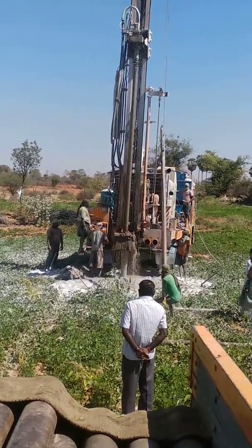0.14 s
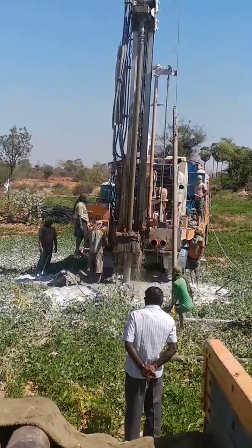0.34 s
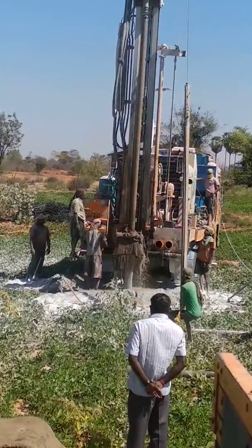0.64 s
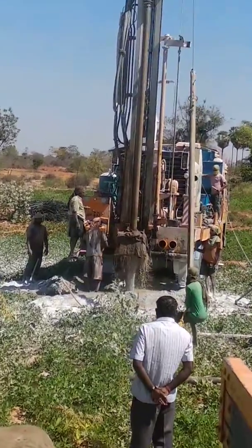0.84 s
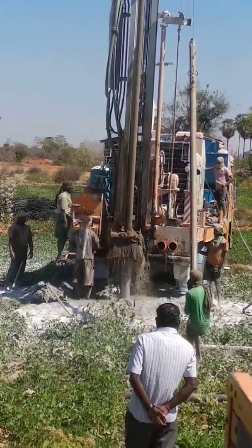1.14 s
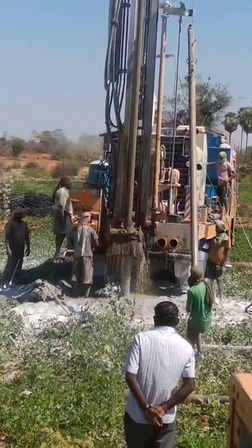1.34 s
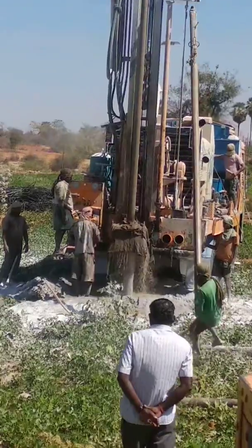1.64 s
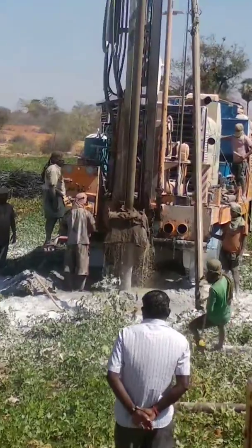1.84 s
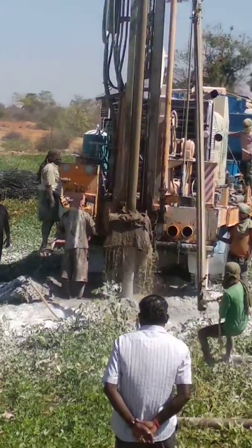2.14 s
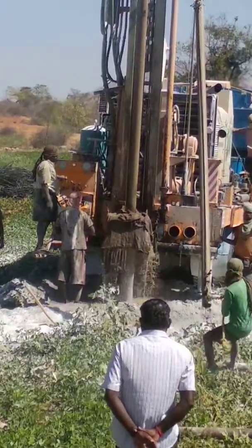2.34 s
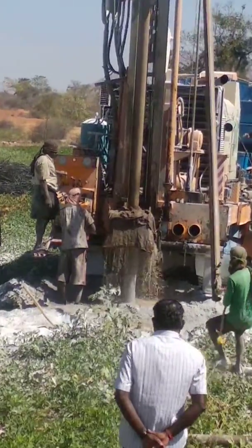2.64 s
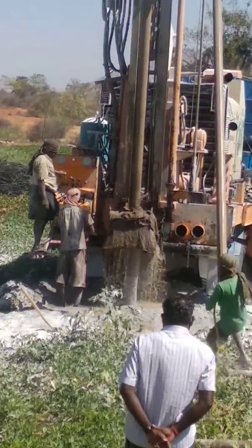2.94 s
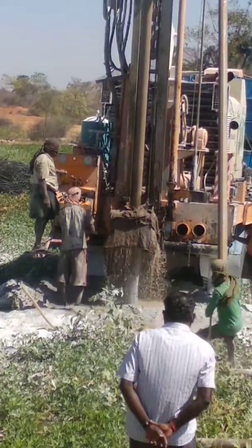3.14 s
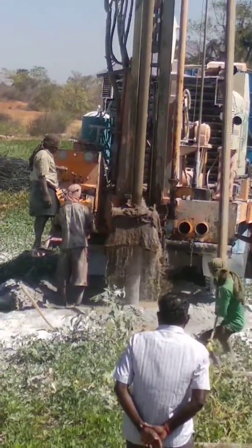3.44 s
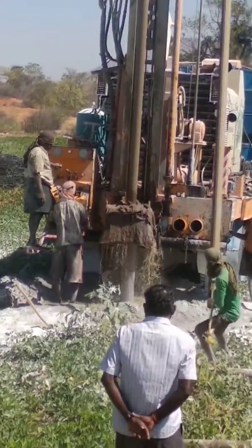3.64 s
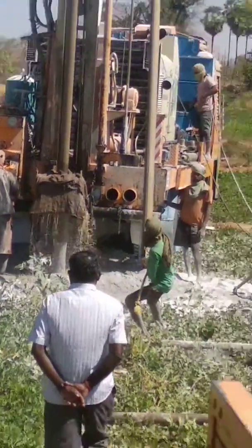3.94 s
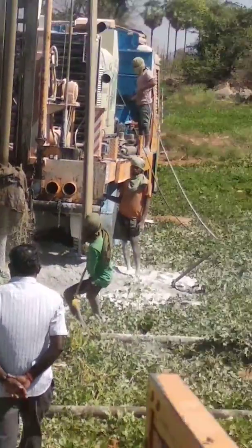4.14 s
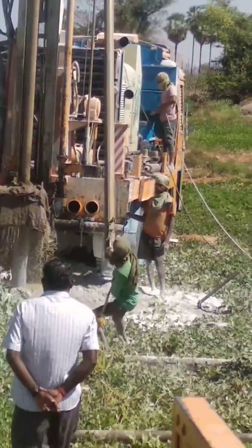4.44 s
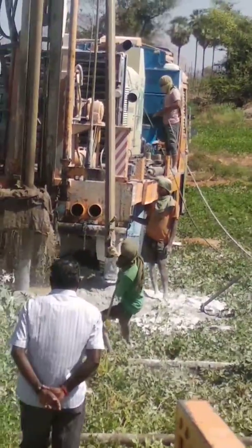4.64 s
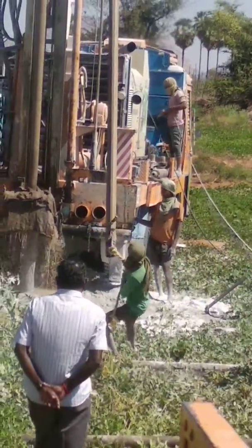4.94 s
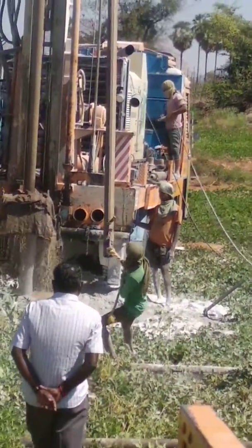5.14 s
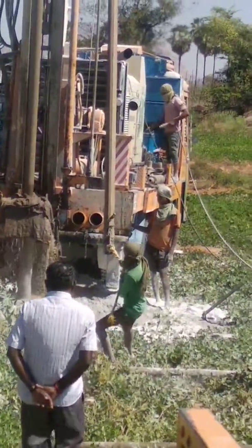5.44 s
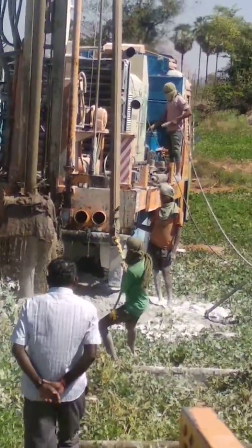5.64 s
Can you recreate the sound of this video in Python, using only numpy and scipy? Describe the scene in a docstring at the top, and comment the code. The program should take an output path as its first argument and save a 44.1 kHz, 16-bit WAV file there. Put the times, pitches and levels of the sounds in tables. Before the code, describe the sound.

Compressed air blasts from a drill pipe with a thin whistle, then hisses and spurts over a steady, clattering diesel engine.

```python
"""Compressed air blasts from a borewell rig's drill pipe for two seconds, ringing the pipe, with a thin
whistle gliding on top. Air and rock dust keep hissing from the bore afterwards, with a few short spurts.
Underneath, the compressor's six-cylinder diesel holds a steady bed of firing tone, roar and clatter,
while the frame knocks, steel squeals and the drill scrapes on grit.
Mast, truck and ground scatter the air and the rubbing steel in the open field."""
import sys
import numpy as np
from scipy import signal
from scipy.fft import rfft, irfft
from scipy.io import wavfile
from scipy.ndimage import uniform_filter1d

SR = 44100
rng = np.random.default_rng(int(sys.argv[2]) if len(sys.argv) > 2 else 0)


def bounce(signal):
    """Save signal as a 16-bit WAV file at the path given by the first command-line argument."""
    frames = np.transpose(np.atleast_2d(signal))
    limited = np.clip(frames, -1, 1)
    pcm = np.round(limited * 32767).astype(np.int16)
    wavfile.write(sys.argv[1], SR, pcm)


N = 255266
T = np.arange(N) / SR
FREQ = np.maximum(np.arange(N // 2 + 1) * SR / N, 1)

# stereo image of the noise: f/Hz, left-right correlation
STEREO_LIKENESS = [(130, 0.85), (290, 1), (640, 0.56), (1410, 0.098), (2400, 0.46), (6800, 0.56),
                   (15000, 0.8)]
# tonal tilt between the microphone ports: f/Hz, left minus right/dB
PORT_BALANCE = [(100, 0.8), (400, 1), (700, 0.5), (4400, 0), (5900, 1.5), (6700, -1), (8500, -4.5),
                (10000, -1), (11200, -3.5), (12500, 4), (15000, 2.5)]

# exhaust partials: multiple of the two-turn engine cycle, relative level/dB
EXHAUST_PARTIALS = [(4, -24), (5, -27), (9, -21.5), (10, -19.5), (11, -16.5), (12, -15), (15, -22),
                    (16, -20.5), (18, -20.5), (22, -16.5), (23, -33), (24, -22.5), (28, -19.5), (35, -22),
                    (37, -21), (46, -22), (72, -23)]
# body of the exhaust roar: f/Hz, relative level/dB
ROAR_EQ = [(20, -27), (35, -22), (55, -0.5), (90, 4.5), (120, -3), (165, 0.5), (290, -1), (350, 5.5),
           (410, -2), (455, -6), (490, -3), (600, -13), (900, -10), (2000, -66)]
# colour of the engine clatter: f/Hz, relative level/dB
CLATTER_EQ = [(300, -2.5), (600, 2), (710, 5.5), (900, -3), (1050, 2), (1200, 5.5), (1400, -2), (1650, -1),
              (1880, 4), (2080, -2), (2500, -9), (3200, -9), (6000, -8), (14000, -31)]
# ringing engine panels: f/Hz, width/Hz, boost/dB
PANEL_MODES = [(1030, 32, 4.5), (1525, 9.4, 14.5), (2225, 37, 13.5), (2672, 65, 17), (2865, 28, 11.5)]
# moments of harder rattling: t/s, half length/s, boost/dB
RATTLE_CUES = [(0.246, 0.46, 3), (1.012, 0.16, 1.5), (1.296, 0.16, 4.5), (1.527, 0.068, 5),
               (2.284, 0.048, 4.5), (3.658, 0.048, 5.5), (4.667, 0.25, 4), (5.635, 0.084, 2.5)]
# dull bumps of the machinery: t/s, level/dB
KNOCK_CUES = [(.44, -37), (3.14, -36), (4.66, -44), (5.527, -33)]
# drill steel on grit: t/s, half length/s, level/dB, f/Hz
SCRAPE_CUES = [(0.145, 0.021, -51, 1960), (.92, 0.18, -44, 2080), (2.892, 0.039, -40, 2300),
               (2.99, .014, -44, 1980), (3.178, 0.05, -43.5, 2750), (3.22, 0.06, -45, 1960),
               (3.665, 0.022, -43, 1900), (4.715, 0.031, -43, 1250), (5.155, 0.035, -41, 1920),
               (5.635, 0.04, -37.5, 2340), (5.69, 0.067, -37, 3450), (5.785, 0.03, -35, 3720)]
# steel rubbing on steel: t/s, half length/s, level/dB, f/Hz
SQUEAL_CUES = [(0.066, 0.015, -38, 2660), (0.167, 0.036, -41, 2750), (0.27, 0.041, -45, 2220),
               (0.74, 0.031, -31.5, 2680), (.86, 0.11, -45, 2690), (1.554, 0.024, -41, 2670),
               (3.144, 0.1, -43, 2710), (3.374, 0.079, -49, 2200), (4.754, .025, -46, 2730),
               (4.89, 0.031, -44, 2720), (5.02, 0.039, -43, 2800), (5.294, 0.031, -43, 2680),
               (5.455, 0.031, -38, 2740)]

# resonances of a leaking joint: f/Hz, width/Hz, relative level/dB
LEAK_MODES = [(5570, 170, -14), (6800, 590, -0.5), (7400, 300, -17), (8750, 230, -7.5), (10900, 600, -15),
              (12240, 100, -10)]
# faint hisses ahead of the blast: t/s, level/dB, decay/s
LEAK_CUES = [(0, -41, 0.06), (.16, -38, 0.15)]
# dust hiss building behind the blast: t/s, level/dB
DUST_FADER = [(0, -57), (.4, -46), (2.45, -33.5), (2.7, -37.5), (3.05, -34), (3.6, -34.5), (3.75, -38),
              (3.9, -36), (4.5, -37), (5.1, -34.5)]
# colour of the dust hiss: f/Hz, relative level/dB
DUST_EQ = [(1500, -40), (2400, 0), (3100, -4), (3500, 4.5), (4600, 2.5), (5400, 6), (6050, 3), (6400, -1),
           (6900, 7), (8500, 3.5), (10500, 4.5), (11500, -3.5), (13700, -5.5), (15500, -11)]
# gusts of grit from the bore: t/s, decay/s, level/dB, low edge/Hz, high edge/Hz
GUST_CUES = [(0, 0.045, -33, 7740, 11600), (2.87, 0.058, -36.5, 6340, 13000), (3.058, .1, -40, 6300, 11000),
             (4.016, 0.15, -39.5, 8000, 13000), (4.298, 0.054, -37.5, 4900, 13000),
             (5.165, 0.13, -39, 9000, 10900), (5.677, 0.51, -37, 1660, 5000)]
# resonances of the air outlet: f/Hz, width/Hz, gain/dB
OUTLET_MODES = [(3900, 90, -4), (4200, 120, 2), (4580, 400, -2), (5042, 60, 6), (5141, 50, 4),
                (5314, 80, 7), (5573, 70, 4), (6450, 200, -3), (7093, 60, 4)]
# late spurts from the pipe: t/s, decay/s, level/dB, high edge/Hz, rush re spurt/dB
SPURT_CUES = [(3.397, 0.09, -28.5, 6050, -8.5), (3.818, 0.037, -36, 6070, -7),
              (5.2, 0.12, -23.5, 7480, -12), (5.416, 0.075, -15, 7440, -7)]
# low rush under a spurt: f/Hz, relative level/dB
SPURT_RUSH_EQ = [(1300, -46), (1900, -3.5), (3100, -2.5), (3600, 6.5), (4700, 12), (5600, -43), (6500, -42)]

# glide of the whistle at the air valve: t/s, f/Hz
WHISTLE_GLIDE = [(.56, 16400), (.64, 13900), (.73, 12350), (.88, 11900), (1.02, 13180), (1.15, 14880),
                 (1.3, 14200), (1.6, 13780), (1.82, 13980), (2.04, 16000)]
# three bands of rough rasp in the surge: f/Hz, nominal width/Hz, relative level/dB
RASP_BANDS = [(3610, 400, -4), (4060, 240, -3), (4450, 420, 0)]
# bright accents on the jet: t/s, half length/s, level/dB, f/Hz, left minus right/dB
FLARE_CUES = [(0.62, 0.028, -19.5, 6700, 0), (0.81, 0.064, -16.5, 10600, -6),
              (1.387, 0.034, -17.5, 10800, -4), (2.117, 0.056, -26.5, 10200, -13)]
# rush of air below the pipe's cut-on: f/Hz, relative level/dB
RUSH_EQ = [(1000, -55), (1800, 2), (2400, -1), (2720, 5.5), (3050, -27), (3700, -13), (4200, -25),
           (4500, 16), (4800, 3), (5500, -41)]
# mild peaks and dips that give the rush a hollow colour: f/Hz, width/Hz, gain/dB
HOLLOW_EQ = [(2715, 70, 2), (3100, 120, -2), (3480, 130, 1), (3720, 70, 2), (4000, 110, 2), (4340, 90, 2),
             (4790, 100, -4)]
# level ride of the rush and the pipe wall: t/s, gain/dB
RUSH_FADER = [(.42, -23), (.52, -3), (.62, -7), (.72, -0.5), (.82, 0.5), (1.08, 2), (1.15, -3), (1.36, -1),
              (1.65, -2.5), (1.8, 1.5), (1.93, -8.5), (2.1, -8), (2.45, -30)]
# bright top of the jet: f/Hz, relative level/dB
JET_TOP_EQ = [(9500, -40), (10700, -7), (11100, 2), (12400, 1.5), (13000, -2.5), (13600, -4), (14200, -2.5),
              (15000, -1), (15700, 1)]
# core of the jet, strong only above the cut-on: f/Hz, relative level/dB
JET_EQ = [(4500, -65), (4800, -34), (5020, 4), (5900, 2.5), (6450, 2), (7400, 4), (8400, 2.3), (9400, 3),
          (10550, 0), (10800, -2), (11600, -22), (13000, -50)]
# pipe resonances in the jet: f/Hz, width/Hz, boost/dB
PIPE_MODES = [(5636, 60, 3.5), (5898, 80, 5), (6222, 60, 3), (7294, 40, 3), (7432, 80, 4), (7564, 40, 3),
              (7980, 50, 5), (8115, 50, 3), (8374, 50, 3.5), (9210, 50, 3), (10325, 40, 4), (10626, 40, 6)]
# level ride of the jet's lowest band, just above the cut-on: t/s, gain/dB
EDGE_FADER = [(.45, 4.5), (.62, -6), (.72, -3.5), (.95, 0), (1.85, -0.5), (2.05, -6.5), (2.3, -5.5)]
# air flow of the blast, in three pushes: t/s, level re full flow/dB
AIR_FLOW = [(.41, -31), (.46, -16.5), (.51, -9), (.6, 1.9), (.7, -1), (.8, -0.5), (1.02, -1.5),
            (1.15, -5.5), (1.31, -7), (1.4, -2), (1.53, -1.2), (1.83, -3.5), (1.92, -8), (2.0, -12.5),
            (2.14, -11), (2.33, -20), (2.5, -18)]
# direction of the jet: t/s, left minus right/dB
BLAST_PAN = [(.44, 3), (.7, 0), (1.2, 0), (1.75, -0.5), (1.97, -4), (2.15, -1.5), (2.32, 1)]

CUT_ON_HZ = 4970  # first cross mode: the pipe radiates strongly only above it
SURGE_S, SURGE_HALF_S = 0.764, 0.091  # the first push overshoots in one surge


def undb(db):
    """Decibels to gain."""
    return 10 ** (np.asarray(db) / 20)


def unit(x):
    """Scale to rms 1."""
    return x / np.sqrt(np.mean(x ** 2))


def pan(db):
    """Left and right gains for a level difference."""
    return undb(np.outer([1, -1], db) / 2)


def automation(points):
    """Join (time, value) points, sample by sample."""
    return np.interp(T, *np.transpose(points))


def hump(s, half_s):
    """A smooth swell that is 1 at time s."""
    return np.exp(-((T - s) / half_s) ** 2)


def swell(s, rise_s, fall_s):
    """A rounded attack up to time s, then a tail."""
    return np.where(T < s, hump(s, rise_s), np.exp(-np.abs((T - s) / fall_s) ** 1.24))


def walk(rate):
    """Random modulator: steps held 1 / rate s and slewed twice; spread near 1."""
    hold = max(int(SR / rate), 2)
    steps = np.repeat(rng.standard_normal(N // hold + 1), hold)
    return 1.486 * uniform_filter1d(uniform_filter1d(steps, hold), hold)[:N]


def across(points):
    """Join (frequency, value) points on a log-frequency axis."""
    hz, value = np.transpose(points)
    return np.interp(np.log(FREQ), np.log(np.sort(hz)), value)


def bell(hz, width):
    """Bell curve across frequency, 1 at its centre."""
    return 1 / (1 + (2 * (FREQ - hz) / width) ** 2)


def bell_eq(bells):
    """Peaks and dips in dB across frequency."""
    return sum(lift_db * bell(hz, width) for hz, width, lift_db in bells)


def colour(x, eq, bells=()):
    """A broad EQ curve with narrow peaks and dips on top; rms 1."""
    return unit(irfft(rfft(x) * undb(across(eq) + bell_eq(bells)), N))


def turbulence():
    """Stereo noise, nearly mono in the bass and widest in the mids."""
    mid, side = rfft(rng.standard_normal((2, N)))
    likeness = np.clip(across(STEREO_LIKENESS), -1, 1)
    mid, side = mid * np.sqrt(1 + likeness), side * np.sqrt(1 - likeness)
    return unit(irfft([mid + side, mid - side], N))


def ringing(response):
    """Turbulence through a frequency response; rms 1."""
    return unit(irfft(rfft(turbulence()) * response, N))


def outlet(low_hz, high_hz, order=30):
    """Air noise in one steep band of the ringing outlet; rms 1."""
    band = 1 / np.sqrt(1 + (low_hz / FREQ) ** (2 * order) + (FREQ / high_hz) ** (4 * order))
    return ringing(band * undb(bell_eq(OUTLET_MODES)))


def shimmer(x, depth_db=2.4, hold_s=.025, size=512):
    """Narrow bands swell and sink at random, so the colour keeps moving; rms 1."""
    bands = signal.stft(x, nperseg=size)[2]
    ripple = rng.standard_normal(bands.shape[1:])
    frames = max(int(hold_s * SR / (size / 2)), 1)
    for _ in range(2):
        ripple = uniform_filter1d(uniform_filter1d(ripple, frames, axis=1), size=2, axis=0)
    return unit(signal.istft(bands * undb(depth_db * unit(ripple)), nperseg=size)[1][:, :N])


def scatter(x, echo_db, spread_s, count=14):
    """Early reflections off mast, truck and ground comb each side in its own way."""
    response = np.zeros((2, N))
    for side in response:
        lag = rng.uniform(.002, spread_s, count)
        taps = unit(rng.standard_normal(count) * np.exp(-lag / spread_s))
        side[(lag * SR).astype(int)] = undb(echo_db) * taps / np.sqrt(count)
    response[:, 0] = 1
    return irfft(rfft(x) * rfft(response), N) / np.sqrt(1 + undb(2 * echo_db))


def exhaust(firing_hz=91, cylinders=6, tone_db=-32, partials_db=-33, roar_db=-40):
    """The diesel bed: a clean firing tone, partials from unequal cylinders and a pulsing roar."""
    firings = np.cumsum(firing_hz * (1 + 0.001876 * walk(2))) / SR
    cycle = 2 * np.pi * firings / cylinders
    drift_db = 0.5 * walk(5.16)
    tone = np.sqrt(2) * np.sin(cylinders * cycle) * undb(tone_db + 0.18 * walk(14))
    partials = 0
    for multiple, db in EXHAUST_PARTIALS:
        gain = undb(db + 1.77 * walk(7))
        phase = multiple * cycle + rng.uniform(0, 2 * np.pi)
        blur = 0.02 * multiple * walk(9)  # uneven timing smears the high partials most
        partials = partials + gain * np.sin(phase + blur)
    partials = np.sqrt(2) * partials * undb(partials_db + drift_db)
    puffs = np.exp(-(firings % 1) / 0.75) * undb(2.9 * walk(70))  # one uneven puff of gas per firing
    roar = colour(turbulence() * (0.52 + puffs), ROAR_EQ) * undb(roar_db + drift_db)
    duck = undb(-5 * hump(SURGE_S, SURGE_HALF_S))  # the bed dips under the surge
    return (tone + partials + roar) * duck


def clatter(level_db=-40):
    """Mechanical noise rings the engine panels, rattling harder now and then."""
    rattle_db = sum(db * hump(s, half_s) for s, half_s, db in RATTLE_CUES)
    panels = colour(turbulence() * undb(1.2 * walk(300)), CLATTER_EQ, PANEL_MODES)
    return panels * undb(level_db + rattle_db + 1.22 * walk(14))


def knocks(attack_s=.004, decay_s=.06):
    """Heavy parts bump and the steel frame answers with a short dull ring."""
    blows = sum(undb(db) * np.exp(-np.abs(T - s) / np.where(T < s, attack_s, decay_s))
                for s, db in KNOCK_CUES)
    return ringing(bell(hz=377, width=80)) * blows


def scrapes(grains_per_s=2200, spread_db=1):
    """Grit cracks under the turning steel in short grainy runs, each ringing at its own pitch."""
    out = 0
    for s, half_s, db, hz in SCRAPE_CUES:
        grains = (rng.random(N) < grains_per_s / SR) * undb(spread_db * rng.standard_normal(N))
        peak = signal.iirpeak(hz, Q=2.7, fs=SR)
        crunch = unit(signal.lfilter(*peak, signal.lfilter(*peak, grains)))
        out = out + crunch * hump(s, half_s) * undb(db)
    return out


def squeals(width_hz=130):
    """Friction excites narrow steel resonances in short swells."""
    out = 0
    for s, half_s, db, hz in SQUEAL_CUES:
        ring = signal.lfilter(*signal.iirpeak(hz, hz / width_hz, fs=SR), rng.standard_normal(N))
        out = out + unit(ring) * hump(s, half_s) * undb(db)
    return out


def leak(rise_s=0.046):
    """A joint hisses faintly while the pressure is still held."""
    hiss = ringing(sum(undb(db) * bell(hz, width) for hz, width, db in LEAK_MODES))
    envelope = sum(undb(db) * swell(s, rise_s, decay_s) for s, db, decay_s in LEAK_CUES)
    return hiss * envelope * undb(2 * walk(63))


def dust(rise_share=0.6):
    """Air carries gritty dust out of the bore: a running hiss with occasional gusts."""
    hiss = colour(turbulence() * undb(1.2 * walk(900)), DUST_EQ)
    hiss = hiss * undb(automation(DUST_FADER) + .5 * walk(24.48))
    gusts = sum(outlet(low_hz, high_hz) * swell(s, rise_share * decay_s, decay_s) * undb(db)
                for s, decay_s, db, low_hz, high_hz in GUST_CUES)
    return hiss + gusts


def spurts(rise_share=0.45, spray_db=-14.5):
    """Short puffs ring the pipe above its cut-on, with a low rush beneath and a spray of dust."""
    out = 0
    for s, decay_s, db, high_hz, rush_db in SPURT_CUES:
        ring = outlet(CUT_ON_HZ, high_hz) * pan(db=-5)
        body = colour(turbulence(), SPURT_RUSH_EQ, OUTLET_MODES) * undb(rush_db)
        spray = colour(turbulence(), DUST_EQ) * undb(spray_db)
        out = out + (ring + body + spray) * swell(s, rise_share * decay_s, decay_s) * undb(db)
    return out


def whistle(jitter_hz=40, fade_db_per_s=3, skew_rad=.7):
    """A gliding edge tone at the valve rides the air flow and tires as the pressure drops."""
    start_s, end_s = WHISTLE_GLIDE[0][0], WHISTLE_GLIDE[-1][0]
    hz = uniform_filter1d(automation(WHISTLE_GLIDE), size=SR // 25) + jitter_hz * walk(300)
    phase = 2 * np.pi * np.cumsum(hz) / SR
    gate = np.clip(np.minimum(T - start_s, end_s - T) / .06, 0, 1)
    level_db = -16 + .58 * automation(AIR_FLOW) - fade_db_per_s * (T - start_s) + 2.2 * walk(59.7)
    return np.sqrt(2) * np.sin([phase, phase - skew_rad]) * undb(level_db) * gate


def rasp(level_db=-28, rough_db=3):
    """A rough rasp in three bands near 3.6-4.5 kHz at the height of the surge."""
    bands = ringing(sum(undb(db) * bell(hz, width) ** 2 for hz, width, db in RASP_BANDS))
    return unit(bands * undb(rough_db * walk(300))) * hump(SURGE_S, SURGE_HALF_S) * undb(level_db)


def flares():
    """The jet flares briefly in a bright band, accenting its pushes."""
    return sum(ringing(bell(hz, width=2800) ** 2) * pan(pan_db) * hump(s, half_s) * undb(db)
               for s, half_s, db, hz, pan_db in FLARE_CUES)


def pipe_wall(low_hz=2850, high_hz=4560, count=11, jitter_hz=28, tilt_db=6, flare_db=3.5):
    """The flow rings close modes of the wall; each flares, fades and drifts on its own; rms 1."""
    out = 0
    for place in np.linspace(0, 1, count):
        detune = 1 + .005 * (rng.standard_normal() + walk(5))
        hz = (low_hz + place * (high_hz - low_hz)) * detune
        phase = 2 * np.pi * np.cumsum(hz + jitter_hz * walk(150)) / SR
        mode = np.sin([phase, phase + .4 * rng.standard_normal()])
        out = out + mode * undb(tilt_db * place + flare_db * walk(30))
    return unit(out)


def rush(air_db=-38.3, wall_db=-34.3, surge_db=5):
    """The blast's body: hollow-sounding air and ringing wall below the cut-on, lifted by the surge."""
    air = shimmer(colour(turbulence(), RUSH_EQ, HOLLOW_EQ)) * undb(air_db)
    wall = pipe_wall() * undb(wall_db)
    ride_db = automation(RUSH_FADER) + surge_db * hump(SURGE_S, SURGE_HALF_S)
    return (air + wall) * undb(ride_db + 1.2 * walk(50.7))


def jet_top(flow_db, level_db=-14.2, flow_slope=0.52):
    """The jet's sheen follows the flow gently and eases back around the surge."""
    sheen = shimmer(colour(turbulence(), JET_TOP_EQ))
    dip_db = -2 * hump(SURGE_S, half_s=0.18)
    return sheen * undb(level_db + flow_slope * flow_db + dip_db + 1.2 * walk(40.5))


def jet(flow_db, level_db=-8.5, edge_top_hz=6380):
    """The jet rings the pipe above its cut-on and loses its low edge as it dies."""
    core = shimmer(colour(turbulence(), JET_EQ, PIPE_MODES))
    edge = irfft(rfft(core) / (1 + (FREQ / edge_top_hz) ** 20), N)
    shelved = core + edge * (undb(automation(EDGE_FADER)) - 1)
    return shelved * undb(level_db + flow_db + 0.8 * walk(45.2))


def blast(open_s=0.422, attack_s=0.013, shut_s=2.424, release_s=0.1, sputter_db=1.4, spit_db=-26):
    """The valve snaps open with a spit, lets jet and rush through, then closes more slowly."""
    flow_db = automation(AIR_FLOW)
    starved = np.clip(flow_db / -9, 0, 1) ** 2  # weak flow sputters, fully from 9 dB down
    flow_db = flow_db + sputter_db * starved * walk(55)
    valve = np.clip((T - open_s) / attack_s, 0, 1) * np.clip((shut_s - T) / release_s, 0, 1)
    air = jet(flow_db) + jet_top(flow_db) + rush()
    spit_envelope = swell(open_s + attack_s, attack_s / 2, fall_s=0.017)
    spit = outlet(CUT_ON_HZ, high_hz=6350) * spit_envelope * undb(spit_db)
    return (air * valve + spit) * pan(automation(BLAST_PAN))


def scene():
    """The mix: engine and knocks stay dry; air and rubbing steel get early reflections."""
    air = blast() + flares() + rasp() + whistle() + dust() + leak() + spurts()
    air = scatter(air, echo_db=-1.5, spread_s=.028, count=24)
    steel = scatter(scrapes() + squeals(), echo_db=-5.5, spread_s=.015)
    return exhaust() + clatter() + knocks() + air + steel


def record(dry, left_lag_s=2.8e-5, ceiling=.93, top_hz=15720):
    """Two microphone ports, each with its own colour, the left a touch late; peaks clip, the top is cut."""
    left_over_right = undb(across(PORT_BALANCE)) * np.exp(-2j * np.pi * FREQ * left_lag_s)
    response = np.array([left_over_right, np.ones(len(FREQ))]) / np.sqrt(np.abs(left_over_right))
    ports = irfft(rfft(dry) * response, N)
    high_cut = signal.ellip(12, .1, 80, top_hz, fs=SR, output="sos")
    return signal.sosfilt(high_cut, np.clip(ports, -ceiling, ceiling))


dry = scene()
out = record(dry)
bounce(out)
```